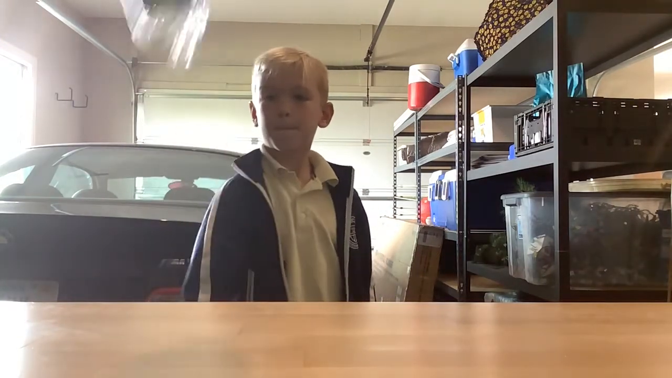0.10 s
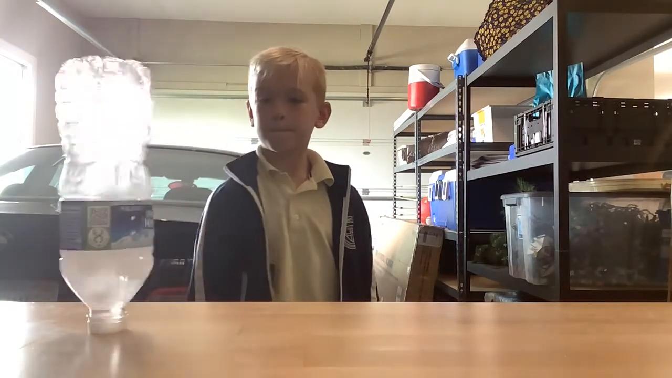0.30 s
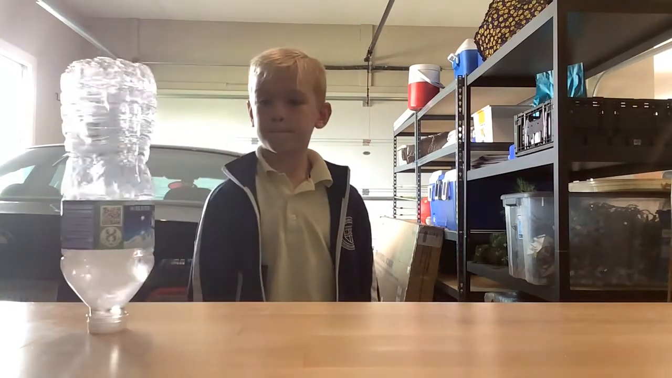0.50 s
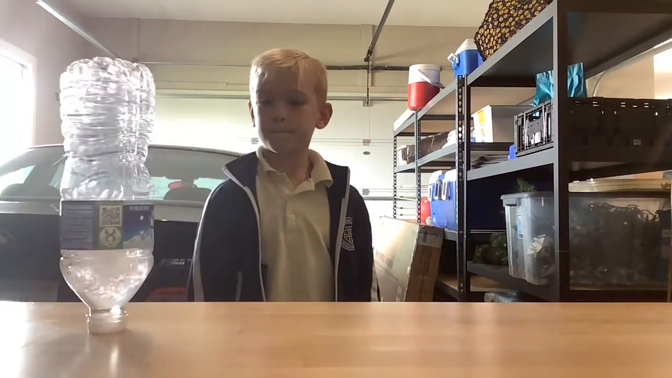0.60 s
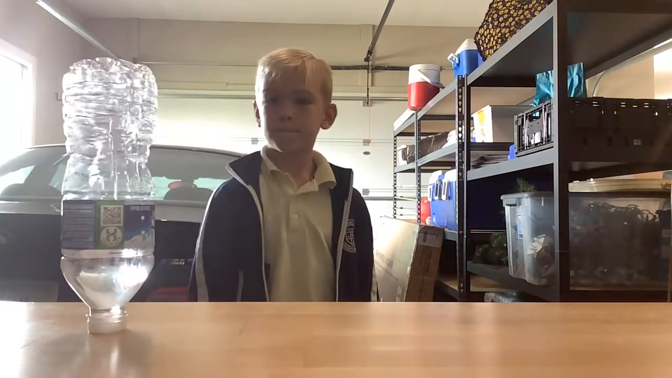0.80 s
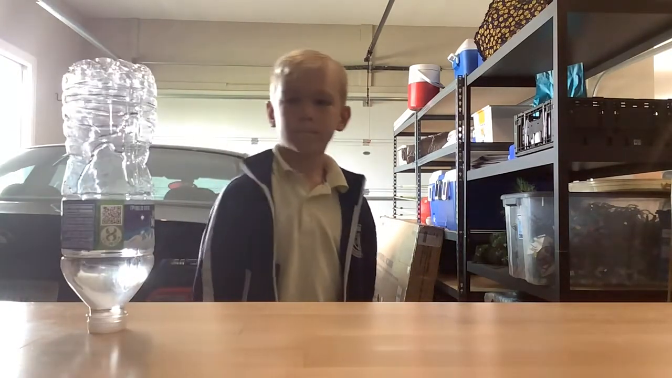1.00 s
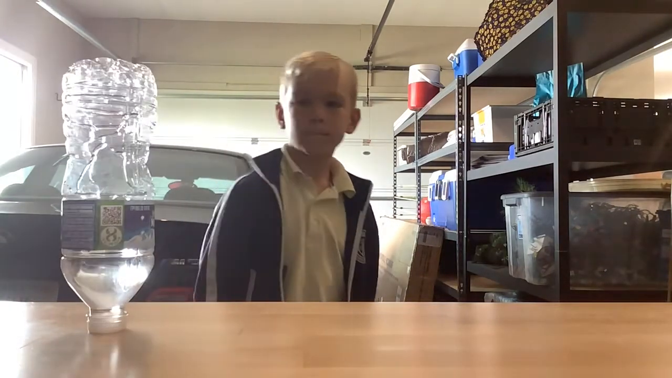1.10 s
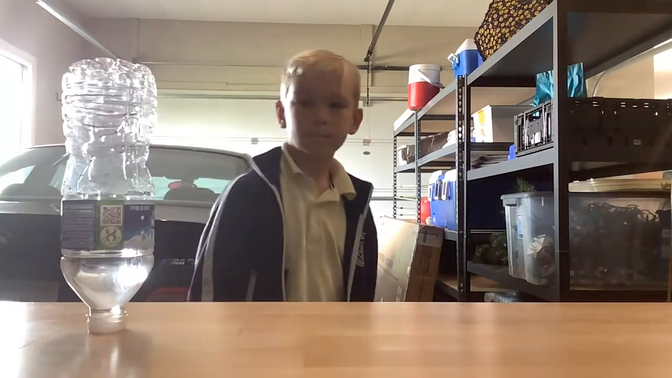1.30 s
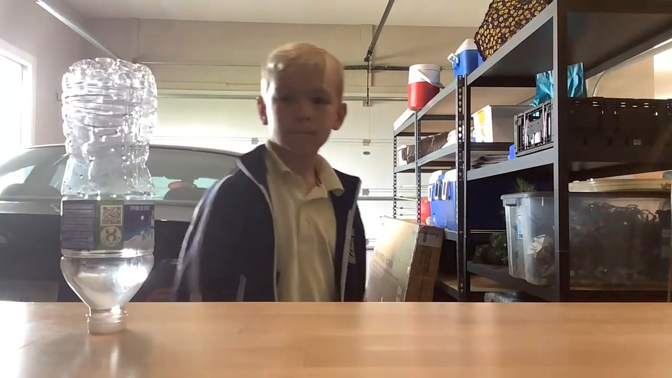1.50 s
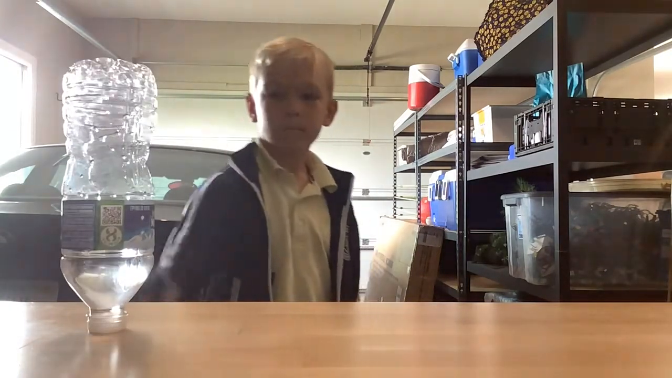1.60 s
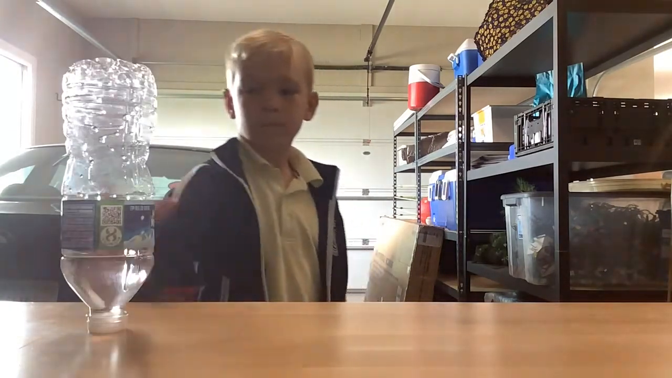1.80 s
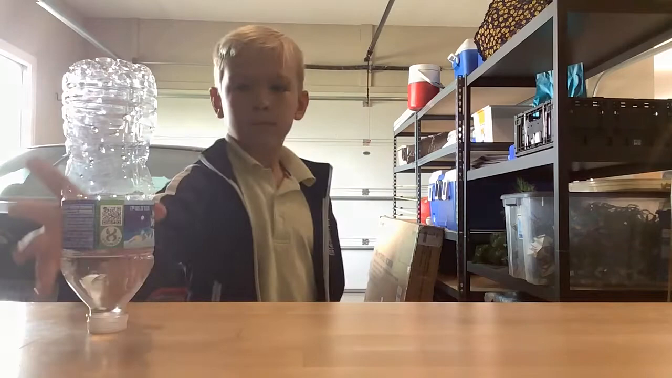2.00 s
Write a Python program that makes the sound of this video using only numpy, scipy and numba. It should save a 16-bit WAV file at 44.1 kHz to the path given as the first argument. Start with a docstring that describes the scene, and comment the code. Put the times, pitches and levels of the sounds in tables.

```python
"""In a garage, a partly filled plastic bottle lands cap first on a wooden table, close to the microphone.
The cap's two blows ring the bottle, bursts of noise make the thin shell crackle, and the water dropping
into the neck rings the boards and thumps the table top. Fading noise makes the garage's echo, the last of
the throw and faint ticks as the bottle settles; steady tones make a low hum, filtered noise the air.
The recorder quietens faint hiss, turns itself down when overloaded and then recovers evenly."""
import sys
import numpy as np
from scipy import signal
from scipy.fft import rfft, irfft
from scipy.io import wavfile
from scipy.ndimage import uniform_filter1d, minimum_filter1d
from numba import njit

SR = 44100
rng = np.random.default_rng(int(sys.argv[2]) if len(sys.argv) > 2 else 0)


def dump_mix(stems):
    """Bounce the given channels to the path in sys.argv[1] as a 16-bit WAV at rate SR."""
    frames = np.atleast_2d(stems).T  # one column per channel
    limited = np.clip(frames, -1, 1)  # hard clip at full scale
    pcm = np.round(limited * 32767).astype(np.int16)
    wavfile.write(sys.argv[1], SR, pcm)


N = 88200  # length in samples: two seconds


def undb(db):
    """Turns decibels into a factor for the size of the wave."""
    return 10 ** (np.asarray(db) / 20)


def since(start_s):
    """Seconds since a moment, zero before it."""
    return np.maximum(np.arange(N) / SR - start_s, 0)


def fade(start_s, t60_s):
    """Starts suddenly, then dies away exponentially, falling 60 dB in t60_s seconds."""
    age = since(start_s)
    return (age > 0) * np.exp(-np.log(1000) * age / np.maximum(t60_s, 1e-3))


def spectrum_hz():
    """Frequencies of the spectrum in Hz, kept above zero so that their logarithm exists."""
    return np.maximum(np.arange(N // 2 + 1) * SR / N, 1)


def noise(colour):
    """Random noise of rms 1, its spectrum shaped by the points of a colour table."""
    points = np.array(colour, float)
    shape_db = np.interp(np.log(spectrum_hz()), np.log(points[:, 0]), points[:, 1])
    x = irfft(rfft(rng.standard_normal(N)) * undb(shape_db), N)
    return x / x.std()


def walk(rate_hz):
    """Slow random drift with a spread of 1: random steps, smoothed twice."""
    step = int(SR / rate_hz)
    steps = np.repeat(rng.standard_normal(N // step + 1), step)
    x = uniform_filter1d(uniform_filter1d(steps, step), step)[:N]
    return x / x.std()


def ring(modes, start_s):
    """A struck object rings at its own pitches, each dying away at its own pace."""
    age = since(start_s)
    return sum(undb(db) * fade(start_s, t60_s) * np.sin(2 * np.pi * hz * age) for hz, db, t60_s in modes)


def reverberation(bands, start_s):
    """Diffuse echo: noise split into overlapping bands, each dying away at its own pace."""
    spectrum = rfft(noise(bands))
    log_hz = np.log(spectrum_hz())
    centres = np.log([row[0] for row in bands])
    echo = 0
    for share, (_, _, t60_s) in zip(np.eye(len(bands)), bands):
        band = irfft(spectrum * np.interp(log_hz, centres, share), N)
        echo = echo + band * fade(start_s, t60_s)
    return echo


def crackle(events, colour):
    """Short cracks of thin plastic: coloured noise let through in sudden, fading bursts."""
    return noise(colour) * sum(undb(db) * fade(start_s, t60_s) for start_s, db, t60_s in events)


# The cap lands and rocks back onto the table: t/s, relative level/dB
CAP_BLOWS = [(0.2226, 0), (0.2648, -17)]
# Pitches at which bottle and cap ring: f/Hz, relative level/dB, time to fall 60 dB/s
BOTTLE_MODES = [(808, -17, .06), (890, -8, 0.061), (955, -5.5, .06), (1042, -14, .07), (1372, -7, 0.073),
                (1470, -12.5, .07), (1532, -12.5, 0.18), (1779, -12.5, 0.11), (1800, -9.5, .15),
                (2248, -9, .08), (2675, -14, .05), (2955, -8, 0.054), (3230, -13.5, .06),
                (7850, -10.5, .03)]
# Pitches at which the table top rings: f/Hz, relative level/dB, time to fall 60 dB/s
TABLE_MODES = [(80.5, -16.5, 0.2), (147, -14.5, 0.1994), (206, -9.5, 0.15), (302, -11, 0.064),
               (343, -8, .09), (377, -5.5, 0.16), (411.3, -10, .13), (520, 1, 0.069), (663, -15.5, .07)]
# Snaps of the buckling shell: t/s, starting level/dB, time to fall 60 dB/s
SHELL_SNAPS = [(.2207, -12.5, .02), (.2224, -2, .012), (.2262, -8, .018), (.2295, -8, 0.0068),
               (.2318, -11, 0.028), (.2358, -16, .012), (.2708, -20.5, .012)]
# Tone colour of the snaps: f/Hz, relative level per Hz/dB
SHELL_SNAP_COLOUR = [(100, -6), (250, 1), (500, 1), (1400, -0.5), (2200, -7), (3100, -2.5), (4200, -8),
                     (5500, -12.5), (7800, -6.5), (11000, -13), (15500, -21.5)]
BOTTLE_DB, TABLE_DB = -4.5, -2.5
WATER_LAG_S, WATER_PUSH_S = .0025, 0.00067  # the water arrives after the cap and pushes softly


def landing():
    """The cap's blows ring the bottle, the water's soft push rings the boards, the shell buckles in snaps."""
    bottle = sum(undb(db) * ring(BOTTLE_MODES, hit_s) for hit_s, db in CAP_BLOWS)
    boards = sum(undb(db) * ring(TABLE_MODES, hit_s + WATER_LAG_S) for hit_s, db in CAP_BLOWS)
    # averaging over the length of the push softens the start
    boards = uniform_filter1d(boards, max(int(WATER_PUSH_S * SR), 1))
    snaps = crackle(SHELL_SNAPS, SHELL_SNAP_COLOUR)
    return undb(BOTTLE_DB) * bottle + undb(TABLE_DB) * boards + snaps


THUD_S, THUD_HZ, THUD_DB = .2318, 111.98, -1  # middle of the thud, pitch, level
THUD_LENGTH_S = .0034  # standard deviation of its bell-shaped swell


def thud():
    """The whole table top gives under the weight of the water: one short, low swing."""
    t = np.arange(N) / SR - THUD_S
    swell = np.exp(-.5 * (t / THUD_LENGTH_S) ** 2)
    return undb(THUD_DB) * swell * np.cos(2 * np.pi * THUD_HZ * t)


# Faint plastic ticks as the bottle settles: t/s, starting level/dB, time to fall 60 dB/s
SETTLING_TICKS = [(.915, -67, 0.042), (1.31, -71, .15), (1.347, -60, .06), (1.591, -70, .025)]
# Tone colour of the ticks: f/Hz, relative level per Hz/dB
SETTLING_COLOUR = [(500, -10), (2200, -7), (3000, 0), (5000, -14), (7000, 1), (9000, -3), (15500, -6)]


def settling():
    """The bottle settles with tiny bursts of noise."""
    return crackle(SETTLING_TICKS, SETTLING_COLOUR)


# Echo of the garage: f/Hz, relative level per Hz/dB, time to fall 60 dB/s
GARAGE_BANDS = [(40, -15, 0.33), (80, 1, 0.99), (149.9, -1, .72), (250, -4, .7), (380, 2, .68),
                (800, 1, .75), (1100, -3.5, .78), (1370, -1.5, .78), (1820, -3.5, 0.76), (2320, -10, .72),
                (3100, -3.5, 0.81), (4300, -8.5, .76), (5360, -6.5, .72), (6000, -9, .7), (6640, -5, .7),
                (9500, -6.5, .58), (12500, -12.5, .48), (15500, -18.5, .38)]
# Fading ring of the throw, a crinkle of the bottle: f/Hz, relative level per Hz/dB, time to fall 60 dB/s
THROW_BANDS = [(300.8, -8.5, 0.6054), (1000, -3.5, .65), (2000, -5, 0.66), (3000, -1, .58), (5370, 0, .56),
               (8000, -5, 0.4734), (10500, -10, 0.41), (15470, -22, .4)]
GARAGE_DB, GARAGE_BUILD_S = -15, 0.0058  # level, time constant of the build-up
THROW_DB = -53.5


def garage():
    """The last of the throw fades; echoes of the landing build up between the walls and die away."""
    lands_s = CAP_BLOWS[0][0]
    build = 1 - np.exp(-since(lands_s) / GARAGE_BUILD_S)
    throw = undb(THROW_DB) * reverberation(THROW_BANDS, 0)
    echo = undb(GARAGE_DB) * build * reverberation(GARAGE_BANDS, lands_s)
    return throw + echo


# Tones of the mains hum and a motor: f/Hz, rms level before wavering/dB
HUM_TONES = [(59.2, -69), (118.4, -69), (177.6, -69), (209.9, -68), (236.9, -62), (355.3, -65.5)]
# Tone colour of the garage air: f/Hz, relative level per Hz/dB
AIR_COLOUR = [(20, -41.5), (38, -29), (58, -6), (85, -5), (125, -.5), (180, -4.5), (270, -7.5), (340, -2),
              (480, -11.5), (800, -19), (1300, -24.5), (2000, -32), (4000, -33), (9000, -35),
              (15500, -41.5)]
HUM_WAVER_DB = 0.56  # spread of each tone's drift in level
AIR_DB, AIR_SWELL_DB = -57.5, -0.25  # level, size of its drift


def background():
    """Steady tones, each wavering a little in level, over dull, nearly steady air noise."""
    hum = 0
    for hz, db in HUM_TONES:
        level = undb(db + HUM_WAVER_DB * walk(4.3))
        cycles = hz * since(0) + rng.random()  # random starting phase
        hum = hum + level * np.sqrt(2) * np.sin(2 * np.pi * cycles)
    air = undb(AIR_DB + AIR_SWELL_DB * walk(5.3)) * noise(AIR_COLOUR)
    return hum + air


def scene():
    """All sources added together at the microphone."""
    return (landing() + thud() + garage() + settling() + background())[None]


HISS_FROM_HZ, HISS_THRESHOLD_DB, HISS_CUT_DB = 1500, -83.5, -7  # noise suppressor


def suppress(x):
    """Noise suppressor: turns down each treble band while it is faint."""
    hz, _, frames = signal.stft(x, SR, nperseg=512)
    # smooth the power over neighbouring frequencies, then over time
    power = uniform_filter1d(np.abs(frames) ** 2, size=7, axis=0)
    power = uniform_filter1d(power, size=7, axis=1)
    faint = 1 / (1 + np.abs(power) / undb(HISS_THRESHOLD_DB) ** 2)
    treble = 1 - 1 / (1 + (hz[:, None] / HISS_FROM_HZ) ** 6)
    return signal.istft(frames * undb(HISS_CUT_DB * faint * treble), SR)[1][:N]


@njit
def duck(over_db, attack_s, hold_s, recover_db_per_s):
    """Gain reduction in dB: follows an overload quickly, holds, then recovers evenly."""
    out, cut, wait = np.empty(len(over_db)), 0., 0.
    for i in range(len(over_db)):
        if over_db[i] > cut:
            cut += (over_db[i] - cut) / (1 + attack_s * SR)
            wait = hold_s
        elif wait > 0:
            wait -= 1 / SR
        else:
            cut = max(cut - recover_db_per_s / SR, 0.)
        out[i] = cut
    return out


CEILING = 1.25  # peak size above which the gain is turned down
ATTACK_S, HOLD_S, RECOVER_DB_PER_S = .001, 0.099, 47
FULL_SCALE, TOP_HZ = .92, 15800  # limit of the rounded peaks, top of the treble


def record(dry):
    """Hiss suppression, gain control that looks just ahead, rounded peaks and a steep top cut."""
    x = suppress(dry[0])
    peak = -minimum_filter1d(-np.abs(x), size=128)  # largest size among the samples around each moment
    over_db = 20 * np.log10(peak / CEILING + 1e-9)
    cut_db = duck(over_db, float(ATTACK_S), float(HOLD_S), float(RECOVER_DB_PER_S))
    rounded = FULL_SCALE * np.tanh(x * undb(-cut_db) / FULL_SCALE)
    top_cut = signal.ellip(10, .2, 80, TOP_HZ, fs=SR, output="sos")
    return signal.sosfilt(top_cut, rounded)[None]


dry = scene()
out = record(dry)
dump_mix(out)
```